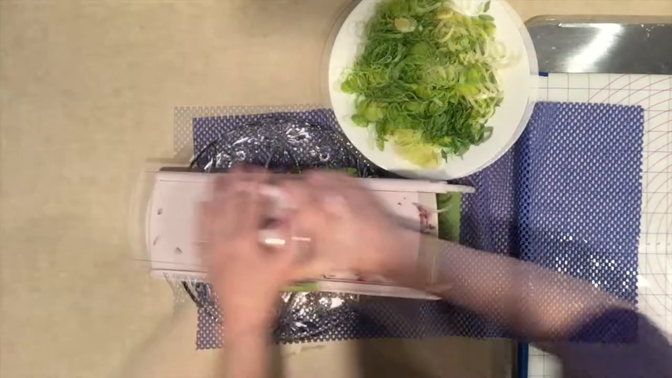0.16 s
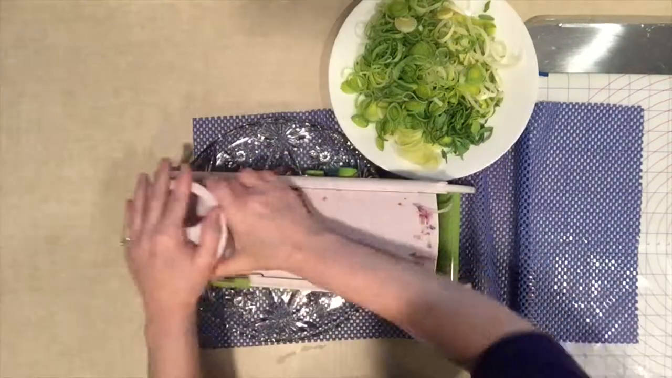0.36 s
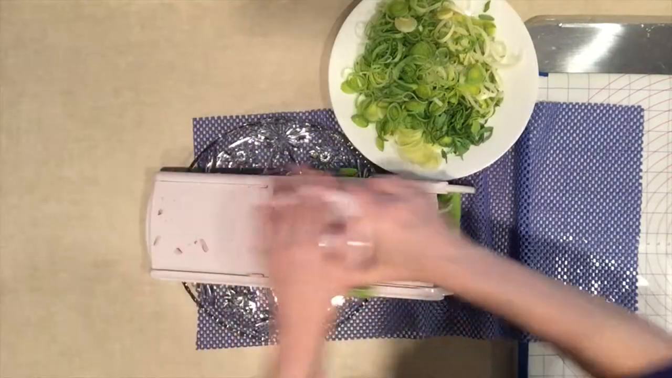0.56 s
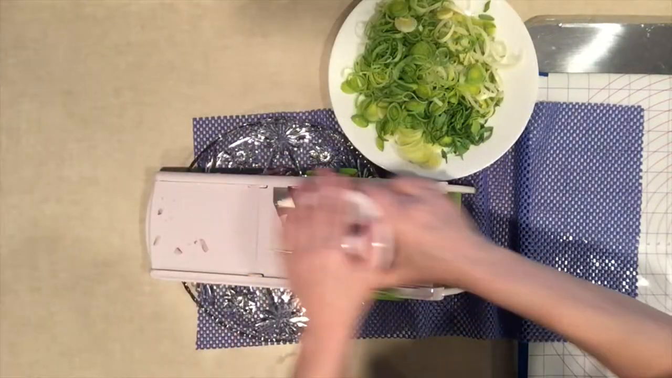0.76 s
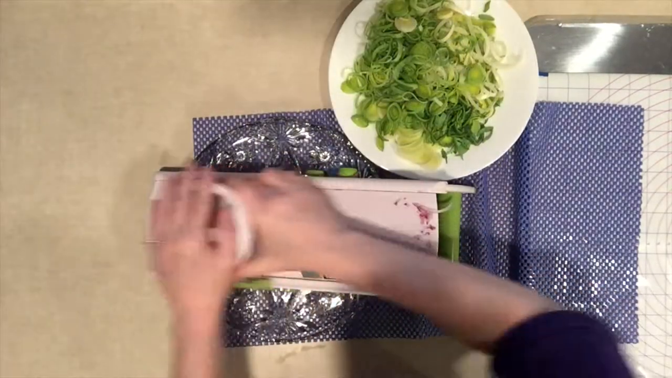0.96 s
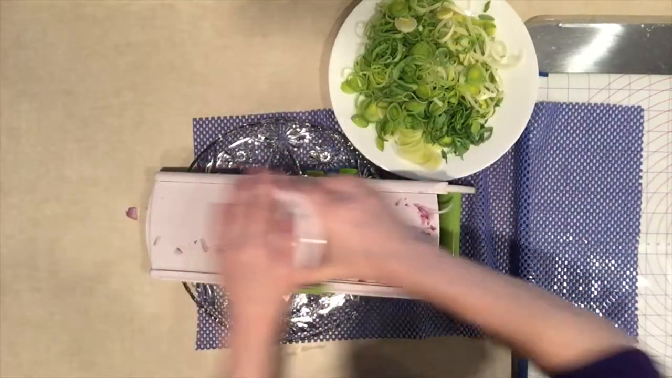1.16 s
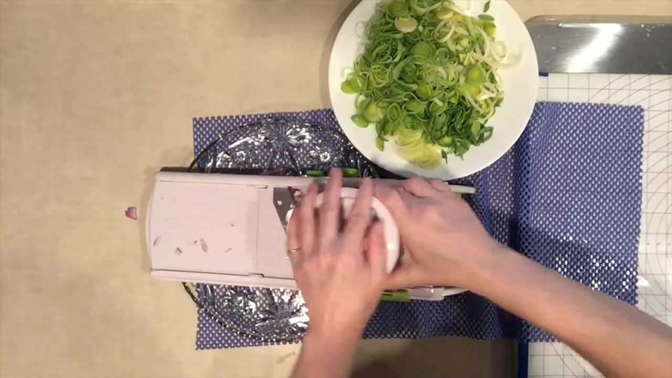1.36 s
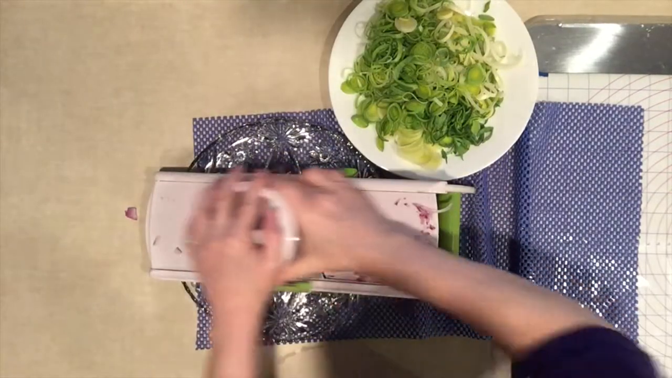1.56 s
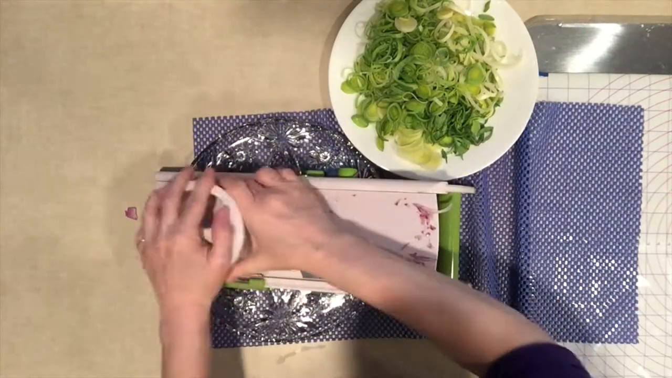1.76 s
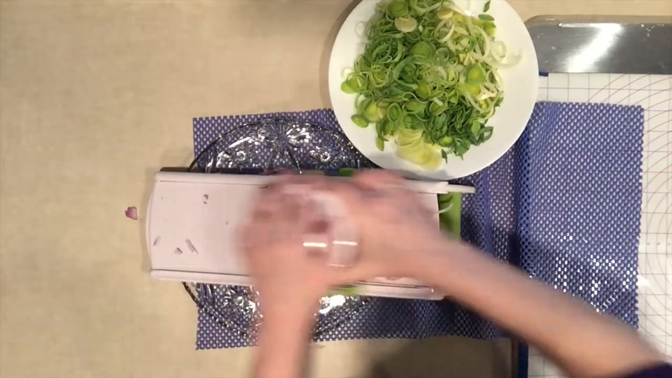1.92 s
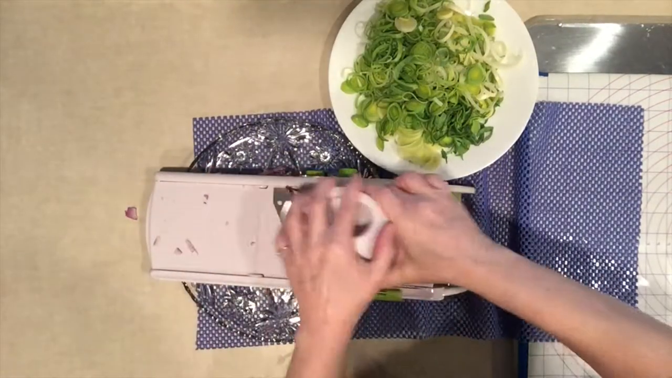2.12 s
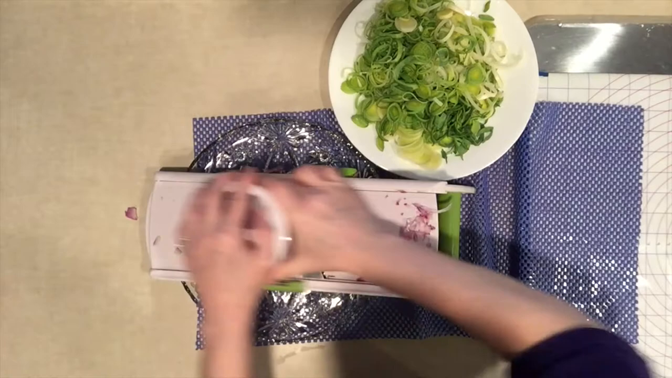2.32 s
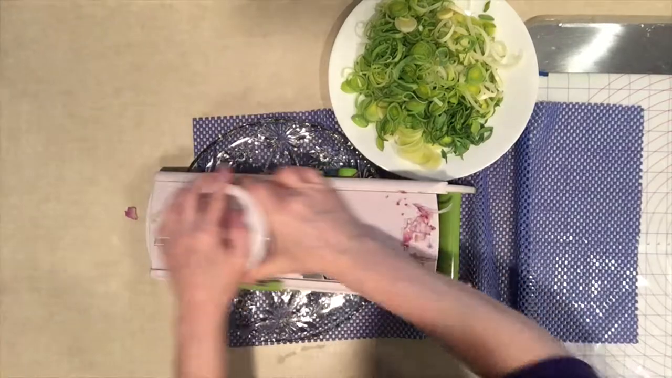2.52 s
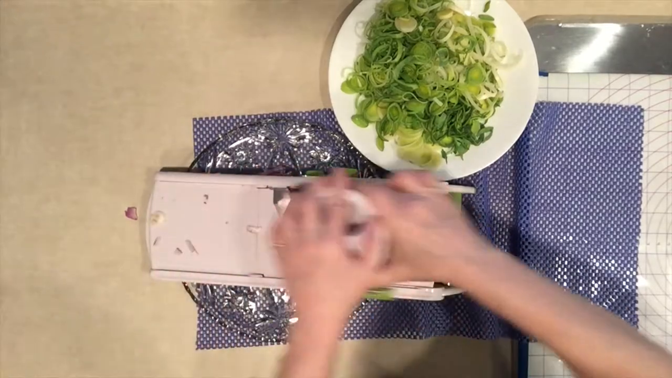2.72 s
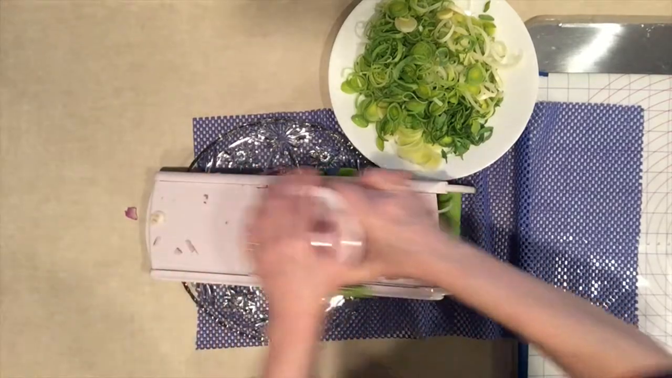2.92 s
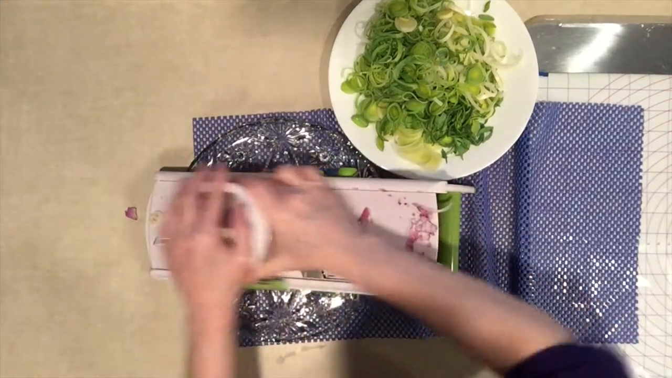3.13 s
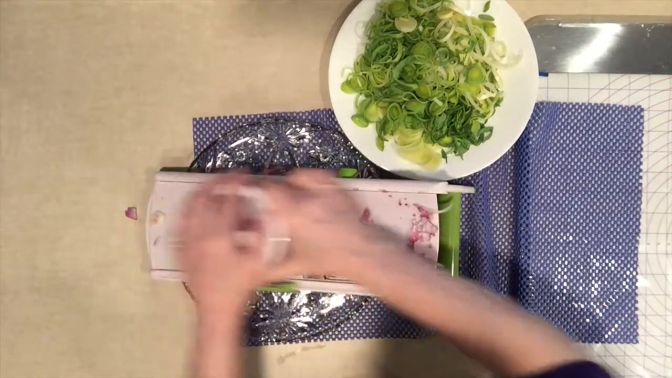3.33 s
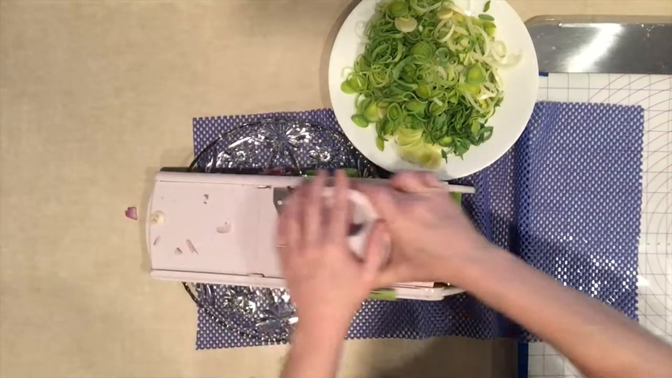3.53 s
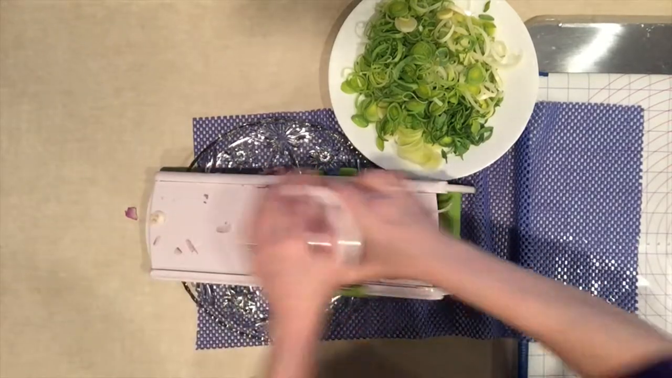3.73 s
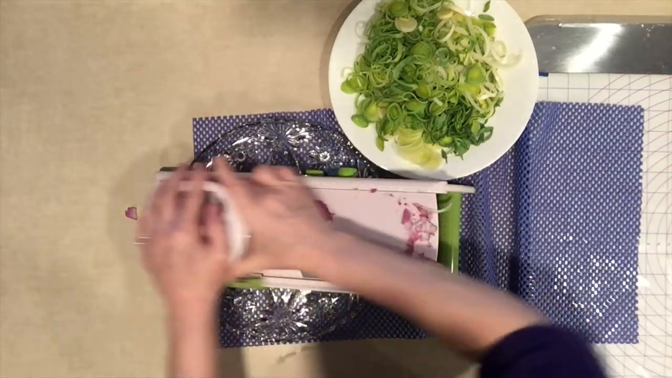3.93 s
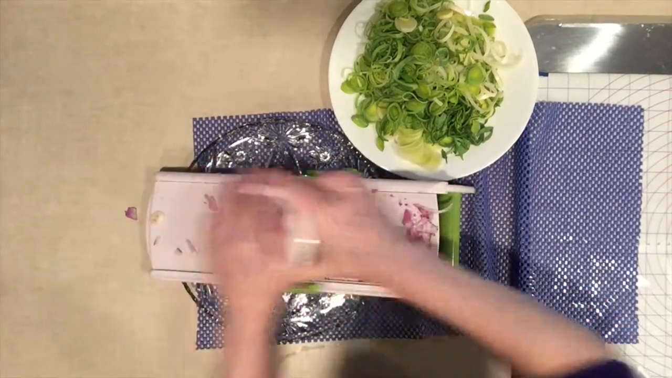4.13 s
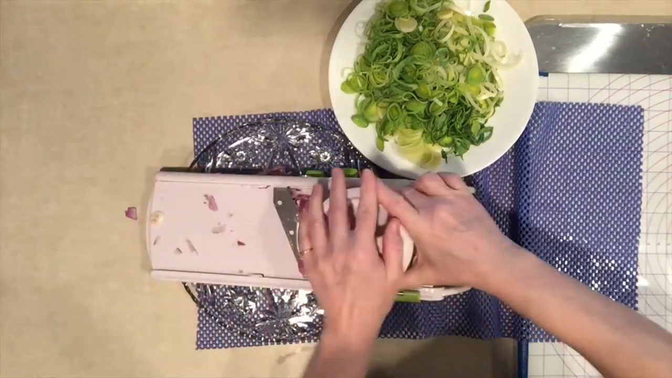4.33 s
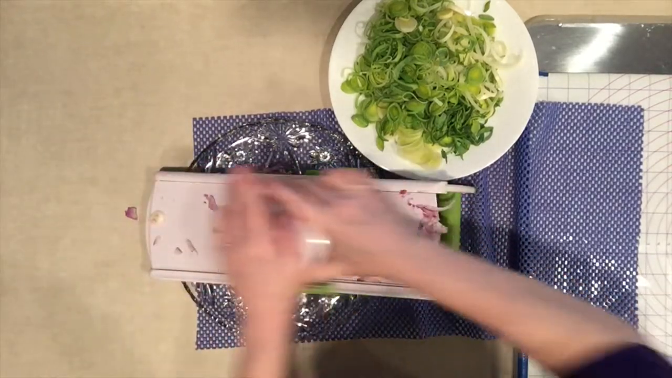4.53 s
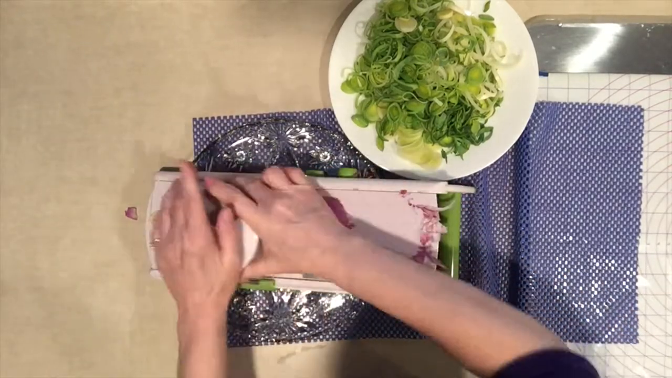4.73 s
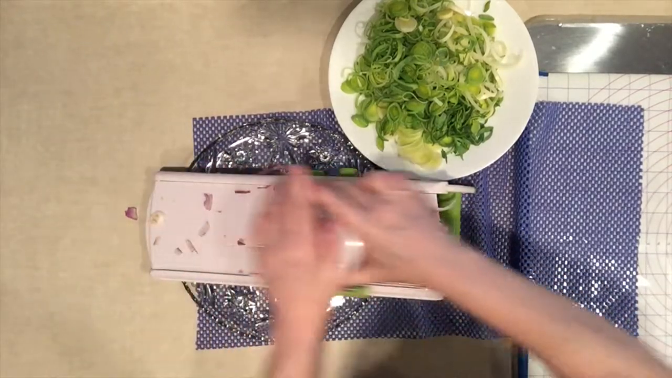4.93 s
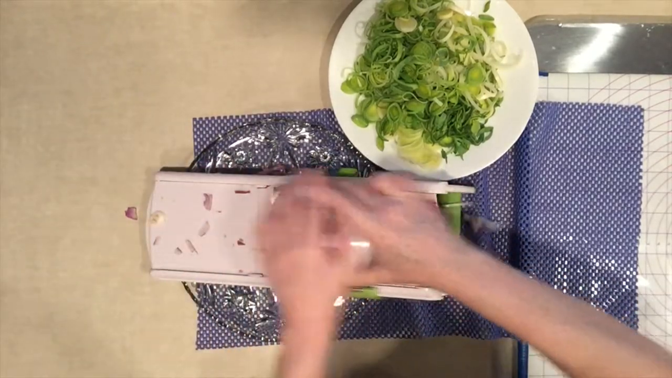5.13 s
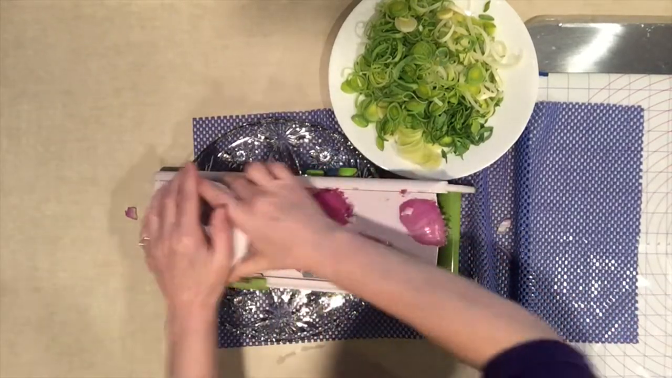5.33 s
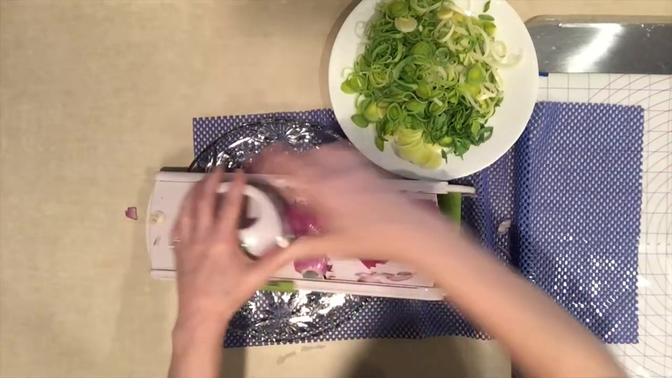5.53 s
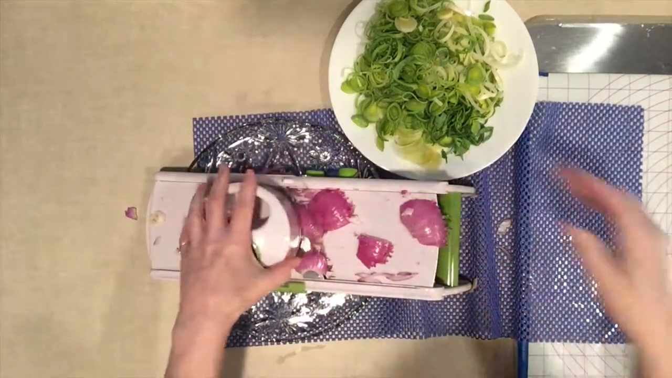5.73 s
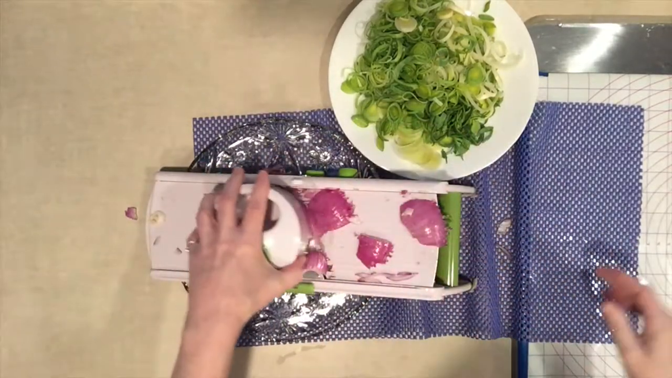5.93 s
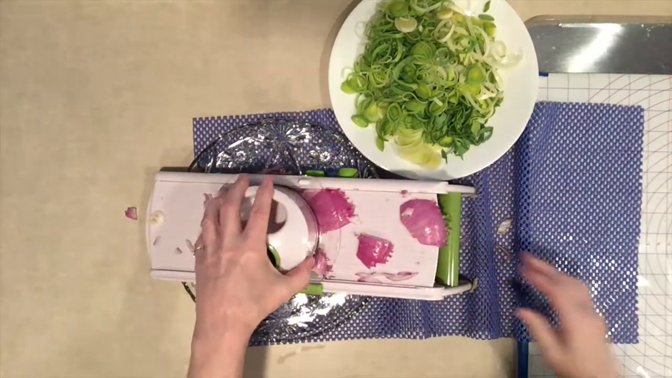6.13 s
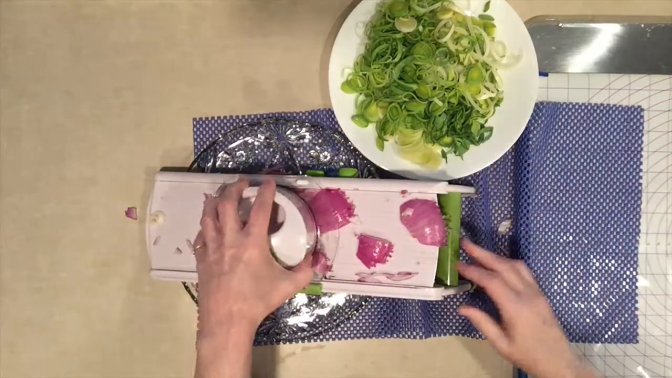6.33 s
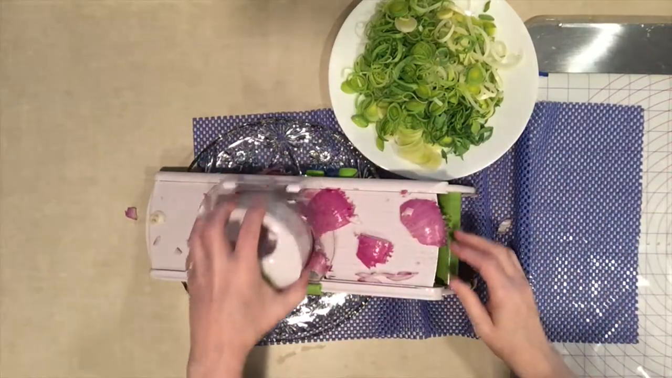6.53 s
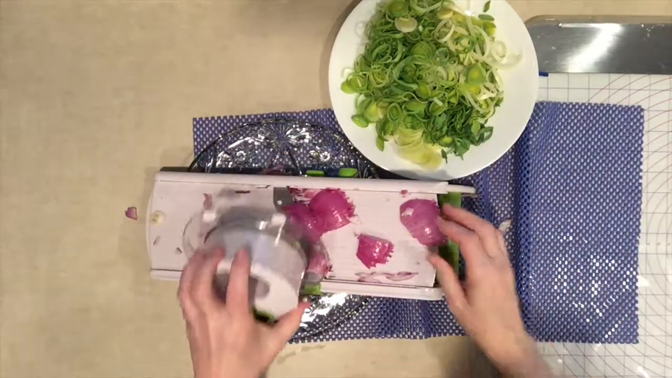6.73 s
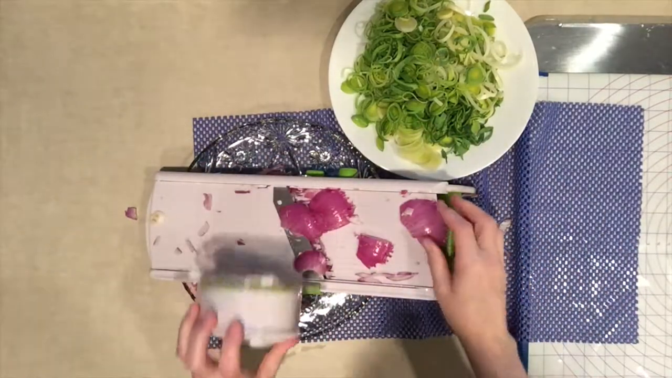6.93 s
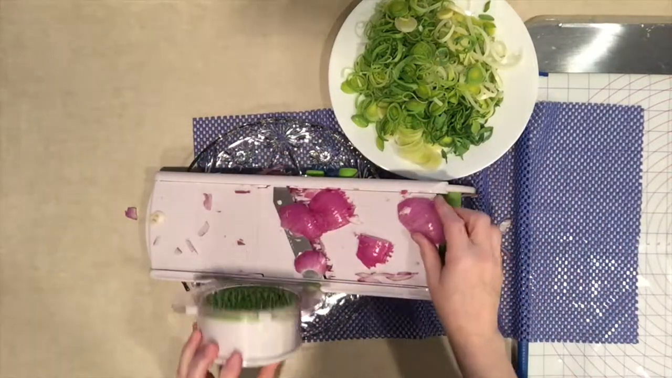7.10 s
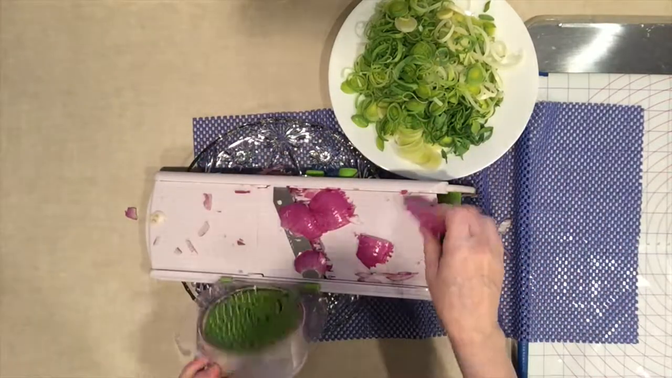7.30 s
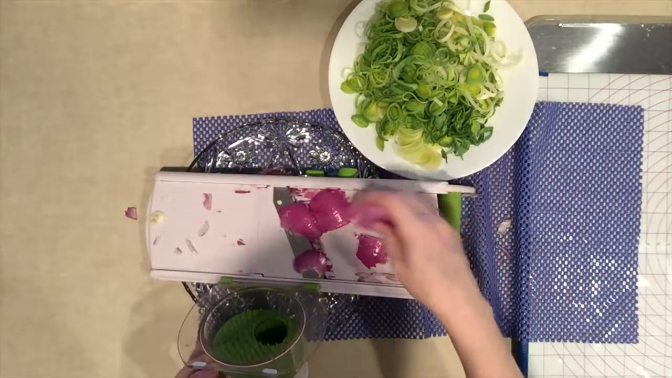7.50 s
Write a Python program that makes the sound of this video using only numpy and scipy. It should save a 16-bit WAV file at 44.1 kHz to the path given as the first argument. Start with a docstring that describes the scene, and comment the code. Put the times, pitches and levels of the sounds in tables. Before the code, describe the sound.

Close up in a reverberant kitchen, an onion in a plastic holder is pushed over a mandoline in quick, regular strokes. Each gives a rub, a short crunchy wet rasp and hollow plastic knocks. The last strokes weaken, fingers rustle softly on the holder, and near the end it lands with a loud sharp crack and brief hollow ring. A faint engine drone and low hum lie behind.

```python
"""Room noise, low hums and a distant engine drone come first, with the rub and ticks of a plastic holder.
The holder pushes an onion over a mandoline sixteen times, the last strokes lightest: friction noise on the
wet deck, then ruptures at the blade that rasp, hiss with juice and excite the resonant deck and frame.
Fingers then shift on the holder, and it lands with a sharp crack and a modal ring, in a reverberant kitchen.
The engine is a sum of partials on a gliding firing rate: it slows, pulls away and changes gear."""
import sys
import numpy as np
from scipy import signal
from scipy.fft import rfft, irfft
from scipy.io import wavfile

SR = 44100
rng = np.random.default_rng(int(sys.argv[2]) if len(sys.argv) > 2 else 0)


def wrap_up_sound(samples):
    """Save the sound to the file named by the first command line argument, as 16-bit audio."""
    columns = np.atleast_2d(samples).T
    # keep every value between -1 and 1, then stretch to whole-number steps
    tamed = np.clip(columns, -1, 1)
    steps = np.round(tamed * 32767).astype(np.int16)
    wavfile.write(sys.argv[1], SR, steps)


N = 333396
TIME = np.arange(N) / SR

# Levels in the tables are relative: each source is weighted again where it is mixed.
# strokes over the blade: bite t/s, cut length/s, rasp level/dB, judder level/dB,
# judder peak after the bite/s, frame rumble level/dB, run-up level/dB, run-out level/dB
STROKES = [ (0.199, 0.07, -34.5, -38.5, 0.018, -40, -56, -48),
           (0.597, 0.032, -37.5, -38.5, 0.028, -44, -51.5, -41),
           (0.919, 0.061, -36, -33.5, 0.0089, -39.5, -46, -50),
           (1.246, 0.046, -38.5, -41, 0.026, -42.5, -60, -48.5),
           (1.574, 0.067, -36.5, -33, 0.0088, -40, -55, -43),
           (1.969, 0.042, -38, -38.5, 0.041, -45, -48, -52), (2.32, 0.085, -38, -31, 0.01, -43, -53, -41),
           (2.693, 0.052, -39, -38.5, 0.028, -52, -58, -46.5),
           (3.057, 0.076, -36, -31, 0.0043, -48.5, -53, -46),
           (3.464, 0.044, -37.3, -37.3, 0.039, -46.5, -58, -68),
           (3.851, 0.036, -34.5, -29.5, 0.0038, -40.5, -51, -41),
           (4.222, 0.032, -38, -41, .020, -48, -53.5, -57),
           (4.587, 0.057, -39.5, -33, 0.028, -50, -57, -48),
           (4.93, 0.064, -44.5, -42.5, 0.085, -59, -54, -58.5),
           (5.272, 0.016, -45.5, -40, 0.0023, -52, -57, -55.5),
           (5.455, 0.083, -69, -56, .070, -52, -74, -69)]
# resonances of the mandoline deck: f/Hz, bandwidth/Hz, level/dB
DECK_MODES = [(1022, 65, -8), (1213, 58, -4.5), (1324, 64, -6), (1411, 93, -7.5)]
# resonances of the frame under the deck: f/Hz, bandwidth/Hz, level/dB
FRAME_MODES = [(116, 42.5, -6), (195.4, 33.4, 1.5), (236.8, 24, -2), (308, 21.3, -3), (701, 43, -9.5)]
# spectral density of the rasp, also of the rub: f/Hz, level/dB
RASP_SPECTRUM = [(150, -6), (460, -7), (750, -1.5), (1050, 7.5), (1750, -0.5), (3100, 2), (4300, -0.5),
                 (4900, -7), (5450, -2.5), (7100, -7.5), (8400, -15.5), (10300, -22), (11200, -14.5),
                 (16000, -22.5)]
EDGE_DB = 23  # a cut, a judder or a shift of grip swells from, and fades to, this far below its end levels


def from_db(db):
    """Amplitude ratio of a level in decibels."""
    return 10 ** (np.asarray(db) / 20)


def rms_one(x):
    """Normalise the mean square to 1."""
    return x / np.sqrt(np.mean(x ** 2) + 1e-20)


def at_hz(points, hz):
    """Interpolate a spectrum on a logarithmic frequency axis."""
    f, value = np.transpose(points)
    return np.interp(np.log(np.maximum(hz, 1)), np.log(f), value)


def drift(rate, at=TIME):
    """Random modulation: Gaussian values, `rate` a second, joined by straight lines; spread about 1."""
    knots = rng.standard_normal(int(TIME[-1] * rate) + 2)
    return np.interp(at * rate, np.arange(len(knots)), knots) * np.sqrt(3 / 2)


def swell(corners, levels_db):
    """Gain envelope of one gesture: linear in dB between corner times in s, silent outside."""
    out = np.zeros(N)
    during = slice(*np.searchsorted(TIME, [corners[0], corners[-1]]))
    out[during] = from_db(np.interp(TIME[during], corners, levels_db))
    return out


def colour(x, spectrum, size=8192):
    """Minimum-phase filtering by the folded cepstrum; white noise keeps its power."""
    gain = rms_one(from_db(at_hz(spectrum, np.arange(size // 2 + 1) * SR / size)))
    cepstrum = irfft(np.log(gain))
    cepstrum[1:size // 2] *= 2
    cepstrum[size // 2 + 1:] = 0
    impulse_response = irfft(np.exp(rfft(cepstrum)))
    return signal.fftconvolve(x, impulse_response)[:N]


def resonate(x, modes, size=8192):
    """Modal superposition: parallel damped oscillators; white noise keeps its power."""
    t = TIME[:size]
    ring = 0
    for k, (hz, width, db) in enumerate(modes):
        decay = np.exp(-np.pi * width * t)
        ring = ring + (-1) ** k * from_db(db) * width * decay * np.cos(2 * np.pi * hz * t)
    return signal.fftconvolve(x, ring / np.linalg.norm(ring))[:N]


def peak(x, hz, q):
    """Single resonance of unit gain, its bandwidth set by the quality factor."""
    b, a = signal.iirpeak(min(hz, .45 * SR), max(q, 1), fs=SR)
    return signal.lfilter(b, a, x + 1e-18)


def grains(per_s, spread_db):
    """Shot noise: tiny ruptures of uneven size and random sign at random moments; rms 1."""
    at, out = np.flatnonzero(rng.random(N) < per_s / SR), np.zeros(N)
    size_db = spread_db * np.minimum(rng.exponential(1, len(at)), 4)
    out[at] = from_db(size_db) * rng.choice([-1, 1], len(at))
    return rms_one(out)


def crackle(per_s, q, lowest_hz=1500, highest_hz=12000, patchy_db=5.5, count=24):
    """Shot noise dealt among resonators whose relative strengths wander; rms 1."""
    snaps, out = grains(per_s, spread_db=2.0), 0
    moments = np.flatnonzero(snaps)
    dealt = rng.integers(0, count, len(moments))
    for k, hz in enumerate(np.geomspace(lowest_hz, highest_hz, count)):
        at, own = moments[dealt == k], np.zeros(N)
        own[at] = snaps[at] * from_db(patchy_db * drift(rate=25, at=TIME[at]))
        out = out + peak(own, hz, q)
    return rms_one(out)


def bursts(times, levels_db, t60, size=2048):
    """Impact noise: each contact is a random-sign burst with an exponential decay of t60 seconds."""
    out = np.zeros(N + size)
    for s, db in zip(times, levels_db):
        at = int(s * SR)
        out[at:at + size] += from_db(db - 60 * TIME[:size] / t60) * rng.choice([-1, 1], size)
    return out[:N]


def engine():
    """Additive synthesis: partials follow the firing rate; under load the lower ones strengthen."""
    # course of the drone: t/s, firing rate f/Hz, level/dB
    course = [(0, 90.6, -54), (.6, 90.2, -47.5), (1.2, 90, -58), (1.55, 82.3, -47), (1.9, 72, -65),
              (2.4, 67.9, -52.5), (2.75, 75, -90), (3.1, 79.3, -50), (3.55, 69.8, -72), (3.9, 65.25, -45),
              (4.35, 80, -58), (4.7, 91.66, -51.5), (5.1, 99, -55), (5.6, 114, -55.5), (6.35, 129, -59),
              (6.7, 100, -54.5), (7.15, 104.6, -56.5), (7.56, 111.5, -64)]
    # partials: multiple of the firing rate, coasting level/dB, pulling level/dB
    partials = [(1 / 2, -25, 0), (2 / 3, -19, 2.5), (0.99, 2, 1.7)]
    t, rates, levels = np.transpose(course)
    hz, db = np.interp(TIME, t, rates), np.interp(TIME, t, levels)
    throttle_opens_s, ramp_s = 4.6, 0.42
    load = np.clip((TIME - throttle_opens_s) / ramp_s, 0, 1)
    lowest_hz = 58  # partials below this hardly carry
    out = 0
    for multiple, coasting_db, pulling_db in partials:
        carries = 1 / np.sqrt(1 + (lowest_hz / (multiple * hz)) ** 16)
        level_db = db + coasting_db + load * (pulling_db - coasting_db) + 1.4 * drift(rate=4.6)
        phase = 2 * np.pi * multiple * np.cumsum(hz) / SR
        out = out + carries * from_db(level_db) * np.sin(phase)
    return out


def background():
    """Stationary coloured noise, slowly amplitude-modulated hums and the distant engine."""
    # spectral density of the room noise: f/Hz, level/dB
    air_spectrum = [(20, -32), (33, -24), (42, -14.5), (72, 1.5), (110, -6.5), (160, -15.5), (280, -18),
                    (440, -25), (680, -23), (950, -14.5), (1350, -20.5), (2500, -32.5), (5000, -42.5),
                    (16000, -58)]
    # low hums of the house: f/Hz, level/dB, waver/dB
    hum_tones = [(48, -61, 2.5), (69.7, -63, 6.5)]
    air = from_db(-54.5) * colour(rng.standard_normal(N), air_spectrum)
    hums = sum(from_db(db + waver_db * drift(rate=2.1)) * np.sin(2 * np.pi * hz * TIME)
               for hz, db, waver_db in hum_tones)
    return air + hums + engine()


def travel():
    """Friction envelope: run-up to the blade, run-out and braking, odd rubs, and a floor of resting hands."""
    # odd rubs outside the pushes: t/s, level/dB
    odd_rubs = [(0.032, -48), (3.21, -41.5), (3.37, -48.5), (4.17, -56.5), (5.92, -58.5), (7.481, -48.5)]
    run_up_s, run_out_s = 0.053, 0.122  # at speed this long before and after the bite
    start_s, stop_s, rub_s = 0.077, 0.1, 0.12  # getting going, braking; rise and fade of an odd rub
    turn_db = 20  # the rub is this much weaker at the turn
    moving = 0
    for s, *_, up_db, out_db in STROKES:
        fast, slowing = s - run_up_s, s + run_out_s
        moving = moving + swell([fast - start_s, fast, slowing, slowing + stop_s],
                                [up_db - turn_db, up_db, out_db, out_db - turn_db])
    for s, db in odd_rubs:
        moving = moving + swell([s - rub_s, s, s + rub_s], [db - turn_db, db, db - turn_db])
    return np.maximum(moving, from_db(-72))  # hands resting on the deck


def grip():
    """Contact-force envelope: a steady grip that loosens, plus a soft swell for each shift of the fingers."""
    # shifts of the fingers: t/s, level/dB
    regrips = [(5.52, -59), (5.96, -57), (6.2, -68), (6.76, -62)]
    regrip_s, relax_db_per_s = 0.15, 2.5
    shifts = sum(swell([s - regrip_s, s, s + regrip_s], [db - EDGE_DB, db, db - EDGE_DB])
                 for s, db in regrips)
    return from_db(-56.5 - relax_db_per_s * TIME) + shifts


def sliding():
    """Friction noise: wet plastic rubs and crackles, exciting deck and frame; fingers rustle on the holder."""
    # spectral density of the fingers on the holder: f/Hz, level/dB
    finger_spectrum = [(200, 9.5), (500, -37), (900, 17), (1300, 3), (2000, 8), (2700, -13), (7000, -23),
                       (16000, -55)]
    fine = from_db(-2.5) * grains(per_s=3200, spread_db=3.5)
    friction = fine + from_db(-7.5) * crackle(per_s=900, q=26, count=16)
    rub = friction * travel() * from_db(2.0 * drift(rate=90))
    surface = from_db(-4.0) * colour(rub, RASP_SPECTRUM)
    deck = from_db(-12.0) * resonate(rub, DECK_MODES)
    frame = from_db(-4.5) * resonate(rub, FRAME_MODES)
    rustle = crackle(per_s=460, q=13.5, lowest_hz=918, highest_hz=3200, count=12)
    fingers = colour(rustle * from_db(-6) * grip(), finger_spectrum)
    return surface + deck + frame + fingers


def ticking(size=2048):
    """Impact excitation: a dry click, pitched by the spot struck, while deck and frame ring."""
    # knocks of the holder on rails and blade: t/s, click level/dB, deck ring level/dB, click pitch f/Hz
    ticks = [ (0.0533, -52, -46, 1630), (0.0785, -51, -58, 1710), (0.1023, -48, -47, 3000),
             (0.1316, -35, -58, 3200), (0.1421, -40, -42, 4600), (0.4477, -29.5, -36, 4400),
             (0.471, -32, -35, 1580), (0.58, -48, -38.5, 1500), (0.6845, -29.5, -38, 4130),
             (0.863, -37.5, -54, 3200), (0.8763, -35.5, -40, 3100), (1.0207, -30, -55, 3430),
             (1.144, -30, -41, 3800), (1.2023, -46, -52, 3000), (1.2887, -29.5, -31, 3200),
             (1.499, -29.5, -32.5, 2760), (1.5712, -42, -47, 2500), (1.613, -30.5, -37, 3730),
             (1.7265, -30.5, -44, 3200), (2.1485, -52, -43, 1604), (2.2172, -36, -35, 1430),
             (2.2321, -35.5, -40, 5500), (2.3151, -55, -29.5, 1600), (2.326, -51, -40, 1500),
             (2.4610, -31, -47, 3420), (2.5634, -31, -37.5, 3140), (2.7956, -28.5, -30, 1350),
             (2.874, -60, -45, 1400), (2.935, -49, -49, 3100), (2.9702, -44, -40.5, 4790),
             (3.0483, -42, -25.5, 1297), (3.061, -25, -21, 1470), (3.1792, -31.5, -57, 3200),
             (3.3235, -45.5, -48, 3950), (3.433, -39, -43, 3556), (3.463, -30.5, -35, 3320),
             (3.656, -65, -64, 1300), (3.6997, -50, -50, 1703), (3.7550, -58, -41.5, 1200),
             (3.8232, -50, -41, 1486), (3.8510, -29.5, -23, 1400), (4.2680, -45, -36, 1416),
             (4.4624, -62, -46.5, 1490), (4.5023, -46, -57, 3755), (4.5759, -59, -35, 1260),
             (4.664, -38, -37.5, 1420), (4.873, -50, -43.5, 3300), (4.9802, -35.5, -36, 3200),
             (5.2448, -60, -38, 1250), (5.275, -41, -34.5, 1300), (5.4451, -51, -56, 4420),
             (5.459, -42.5, -42.5, 2757), (5.4971, -48, -61, 5270), (5.52, -46.5, -39, 1502),
             (6.05, -56, -42.5, 1455), (6.6880, -66, -49, 1650), (6.7469, -55.5, -41.5, 1650)]
    # spectral density of the plastic click: f/Hz, level/dB
    click_spectrum = [(150, -3), (500, -5.5), (1100, -3.5), (2200, -0.5), (3400, 4), (5200, -2), (6800, -4),
                      (8500, -10), (9500, -11.5), (11500, -15), (16000, -19)]
    click, blow = np.zeros(N), np.zeros(N)
    for s, click_db, ring_db, hz in ticks:
        at = int(s * SR)
        snap = bursts([0], [click_db], t60=0.018)[:size]
        spot = peak(snap, hz, q=hz / 750)  # every spot has the same 750 Hz bandwidth
        click[at:at + size] += from_db(2.0) * snap + from_db(-5.5) * spot
        blow[at] = from_db(ring_db + 20.5)
    frame = from_db(-9.5) * resonate(click, FRAME_MODES)
    return colour(click, click_spectrum) + resonate(blow, DECK_MODES) + frame


def pressure(levels_db, sag_db):
    """Force envelope at the blade: each cut bites, eases through the onion and lets go."""
    bite_s, release_s = 0.025, 0.085
    force = 0
    for (s, length, *_), db in zip(STROKES, levels_db):
        end, end_db = s + length, db - sag_db
        force = force + swell([s - bite_s, s, end, end + release_s],
                              [db - EDGE_DB, db, end_db, end_db - EDGE_DB])
    return force


def drag():
    """Strain envelope on the deck: it builds past the bite until the onion gives way, then fades."""
    rise_s, fade_s, onset_db = 0.035, 0.069, 3.5  # at the bite it is onset_db below its peak
    strain = 0
    for s, _, _, db, lag, *_ in STROKES:
        strain = strain + swell([s - rise_s, s, s + lag, s + lag + fade_s],
                                [db - EDGE_DB, db - onset_db, db, db - EDGE_DB])
    return strain


def deck_under_load(force):
    """Shifting modal participation: as the holder travels, now one deck mode answers most, now another."""
    total = np.linalg.norm(from_db(np.array(DECK_MODES)[:, 2]))
    out = 0
    for hz, width, db in DECK_MODES:
        share = from_db(db + 2 * drift(rate=14)) / total
        out = out + share * resonate(grains(per_s=1200, spread_db=2.0) * force, [(hz, width, 0)])
    return out


def cutting():
    """Fracture noise: cells burst and spray layer by layer; drag makes the deck judder and the frame rumble."""
    # spectral density of the juice hiss: f/Hz, level/dB
    juice_spectrum = [(2500, -46), (6000, 7.5), (9000, 15), (11500, 2), (16000, 0)]
    _, _, rasp_db, _, _, rumble_db, _, _ = np.transpose(STROKES)
    layers = from_db(1.14 * drift(rate=180))
    force = layers * pressure(rasp_db, sag_db=1.5)
    fine = from_db(-2.5) * grains(per_s=7000, spread_db=2.5)
    tearing = fine + from_db(-6.5) * crackle(per_s=2200, q=23.0)
    rasp = colour(tearing * force, RASP_SPECTRUM)
    spray = grains(per_s=1800, spread_db=-1.5) * force
    juice = colour(spray * from_db(-13.5), juice_spectrum)
    judder = deck_under_load(layers * drag())
    catches = from_db(2.0 * drift(rate=140))  # the onion catches and slips
    jolts = grains(per_s=2500, spread_db=0.0) * catches * pressure(rumble_db, sag_db=3.4)
    rumble = resonate(jolts, FRAME_MODES)
    return from_db(1.0) * rasp + juice + from_db(-6.0) * judder + from_db(2.0) * rumble


def table_echoes(x):
    """Comb-like interference: reflections close behind the direct sound ripple its spectrum."""
    # first reflections from bowl and table: delay t/s, level/dB
    echoes = [(.0011, -52.5), (.0023, -21), (.0037, -22.5)]
    return x + sum(from_db(db) * np.pad(x, (int(delay * SR), 0))[:N] for delay, db in echoes)


def landing():
    """Impact and free vibration: one edge touches, the holder slaps down and rocks; crack and hollow ring."""
    # contacts with the table: t/s, crack level/dB, ring level/dB
    contacts = [(7.4826, -35.5, -54), (7.4942, -12.5, -1), (7.4982, -31, -21), (7.5037, -19.5, -18)]
    # modes of the holder on the table: f/Hz, level/dB, t60/s
    holder_modes = [(123, -28, 0.15), (188.5, -26, 0.075), (493, -40, 0.11), (634, -17, 0.061),
                    (775, -32, 0.066), (863, -18.5, 0.078), (969, -7.5, 0.073), (1014, -18, 0.11),
                    (1280, -26, 0.093), (1235, -26, 0.14), (1650, -21.5, .16), (1850, -25, 0.19),
                    (2166, -26, 0.16), (2264, -26, 0.16), (2360, -21, 0.12), (2620, -33, 0.13),
                    (2740, -36, 0.079), (3120, -30, 0.12), (3070, -39, 0.066), (3820, -24, 0.036)]
    # spectral density of the crack: f/Hz, level/dB
    crack_spectrum = [(200, -35), (500, -13), (900, 3.5), (1500, -4.5), (2600, -2.5), (3400, -12),
                      (4200, -10.5), (6300, -13.5), (8500, -19.5), (16000, -31)]
    s, crack_db, _ = np.transpose(contacts)
    out = colour(bursts(s, crack_db, t60=0.033), crack_spectrum)
    for start, _, ring_db in contacts:
        at = int(start * SR)
        t = TIME[:N - at]
        seating = 1 - np.exp(-t / 0.00086)  # the edge takes a moment to seat
        for hz, mode_db, t60 in holder_modes:
            decay = from_db(ring_db + mode_db - 60 * t / t60)
            out[at:] += decay * seating * np.sin(2 * np.pi * hz * (t - .0012))
    return out


def kitchen(x, first_echo_s=0.0035, size=32768):
    """Diffuse reverberation: convolution with noise that decays at its own rate in each octave band."""
    # reverberation time of the kitchen: f/Hz, t60/s
    decay_times = [(100, 0.33), (400, 0.19), (1200, 0.5), (4000, 0.41), (8000, 0.38), (16000, 0.21)]
    t, white = TIME[:size], rfft(rng.standard_normal(size))
    octave = np.log2(np.clip(np.arange(len(white)) * SR / size, 125, 16000) / 125)
    tail = 0
    for k in range(8):
        band = irfft(white * np.maximum(1 - abs(octave - k), 0))
        tail = tail + band * from_db(-60 * t / at_hz(decay_times, 125 * 2 ** k))
    tail = tail * (t > first_echo_s)
    return signal.fftconvolve(x, tail / np.linalg.norm(tail))[:N]


def scene():
    """Superposition of direct sound from slicer and holder, their reverberation and the background."""
    far = background()
    slicer = from_db(-.5) * table_echoes(sliding() + cutting()) + ticking()
    clack = landing()
    room = kitchen(from_db(-9.0) * slicer + from_db(-8) * clack)
    return (slicer + clack + room + far)[None]


def record(dry, top=0.7, low_cut_hz=34, high_cut_hz=16000):
    """Band limiting and soft saturation: deep bass and top treble are cut, the loudest peaks rounded."""
    dry = signal.sosfilt(signal.butter(4, low_cut_hz, "high", fs=SR, output="sos"), dry)
    rounded = dry / (1 + (dry / top) ** 6) ** (1 / 6)
    return signal.sosfilt(signal.ellip(10, .1, 70, high_cut_hz, fs=SR, output="sos"), rounded)


dry = scene()
out = record(dry)
wrap_up_sound(out)
```